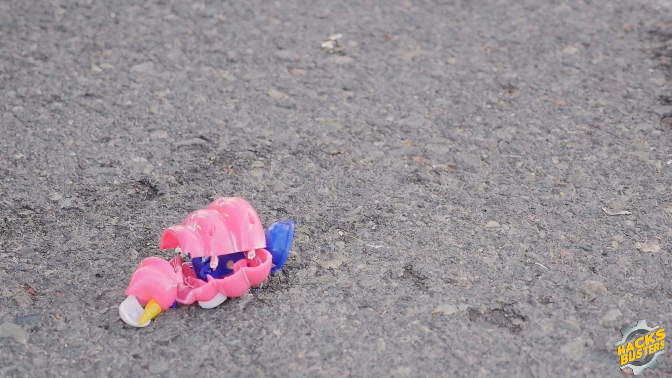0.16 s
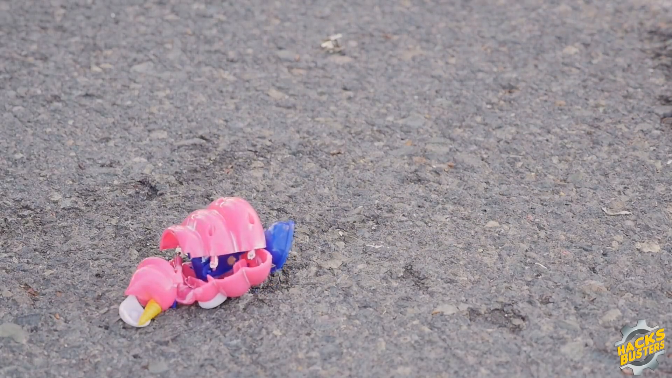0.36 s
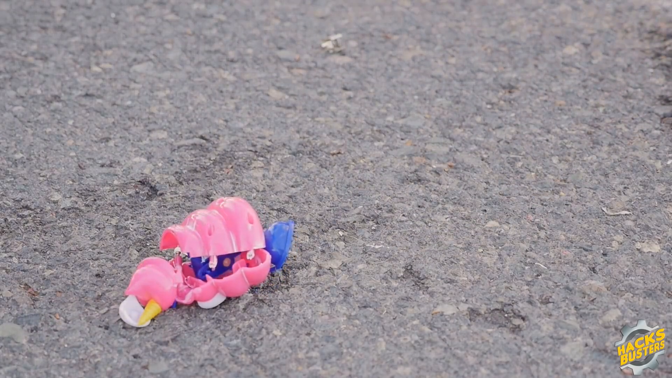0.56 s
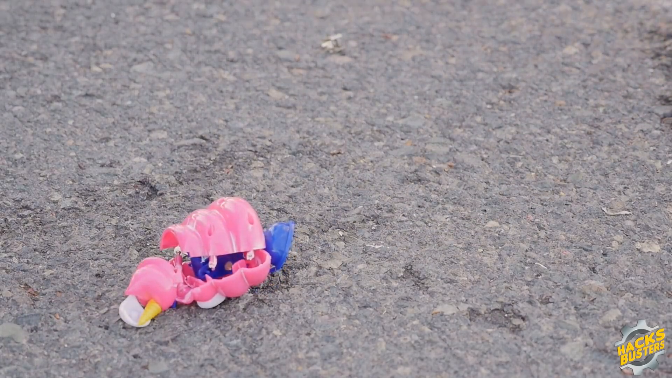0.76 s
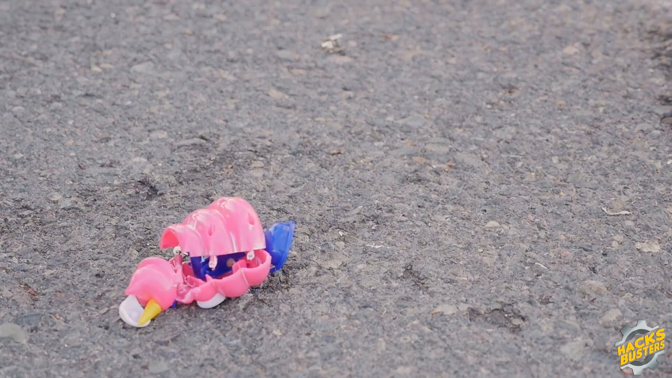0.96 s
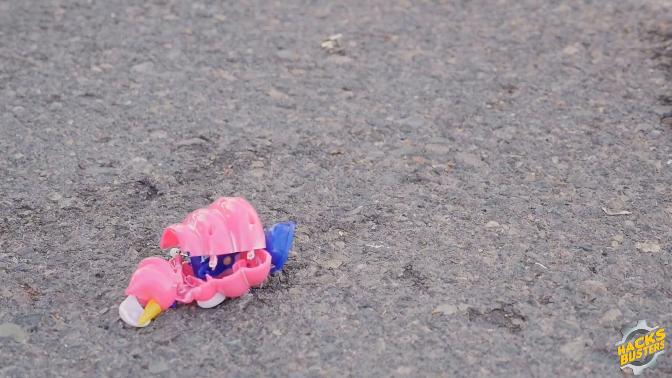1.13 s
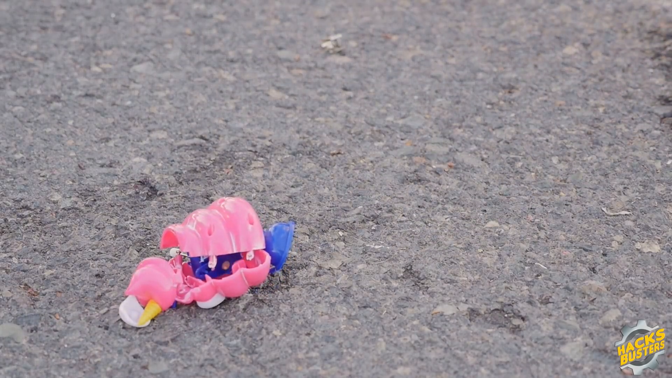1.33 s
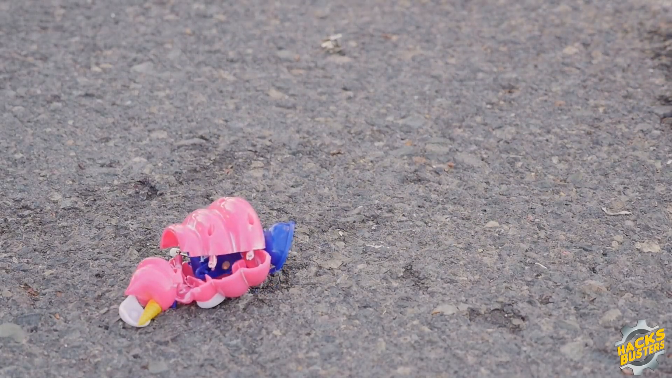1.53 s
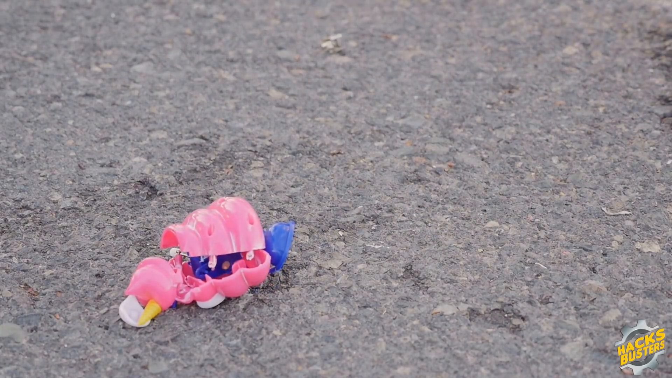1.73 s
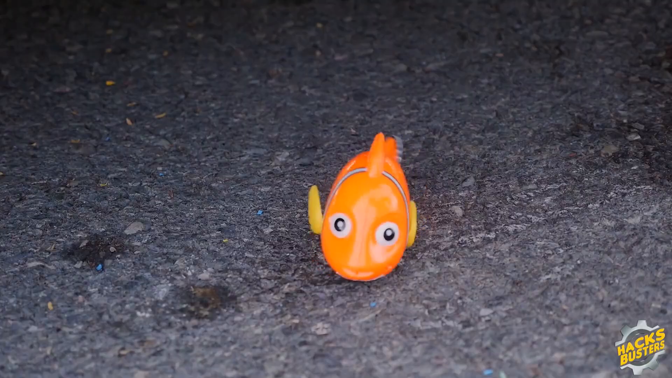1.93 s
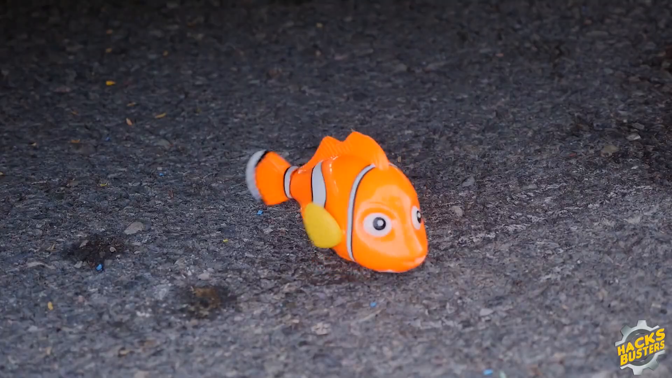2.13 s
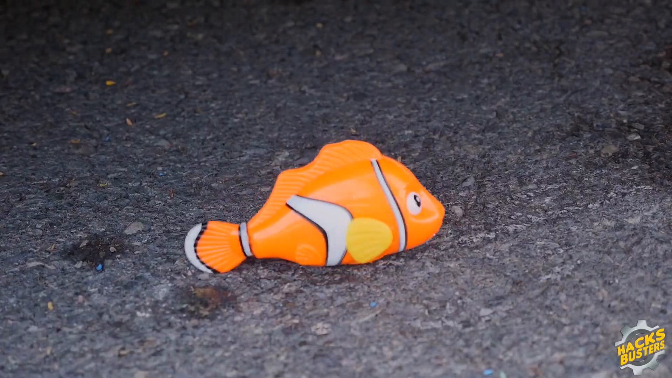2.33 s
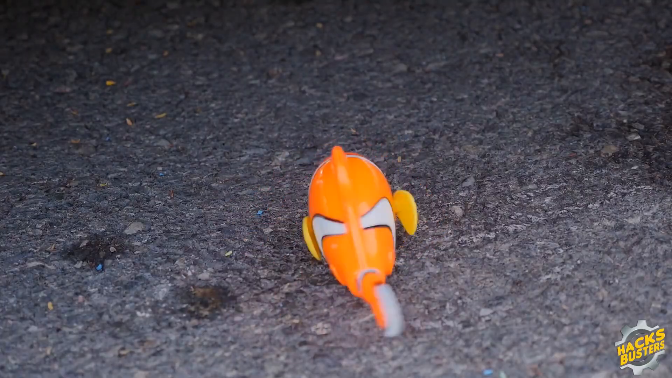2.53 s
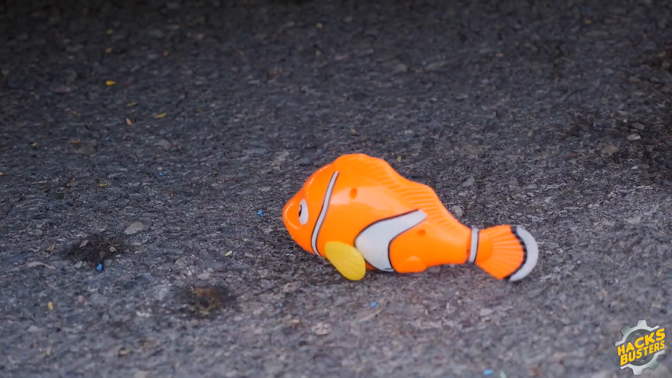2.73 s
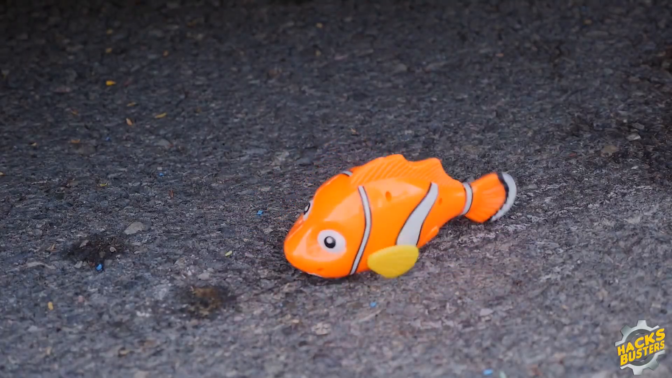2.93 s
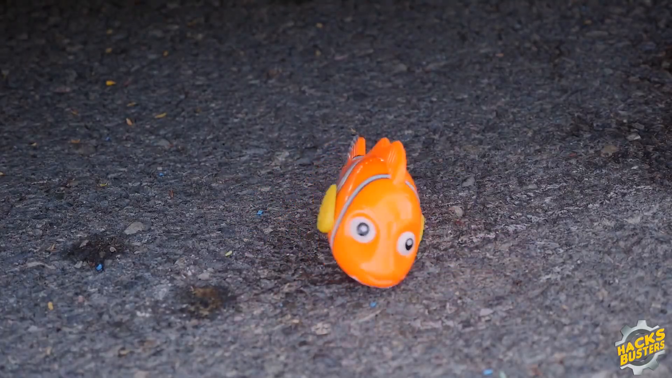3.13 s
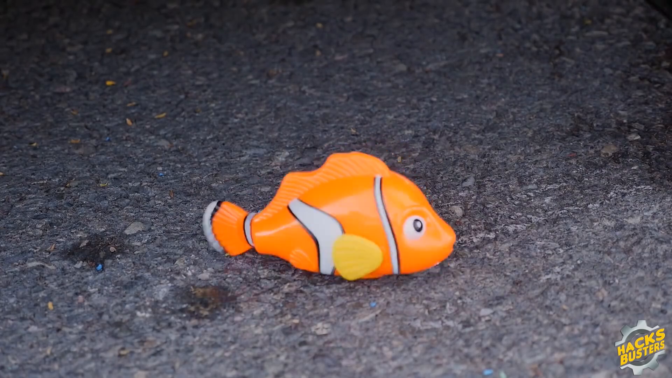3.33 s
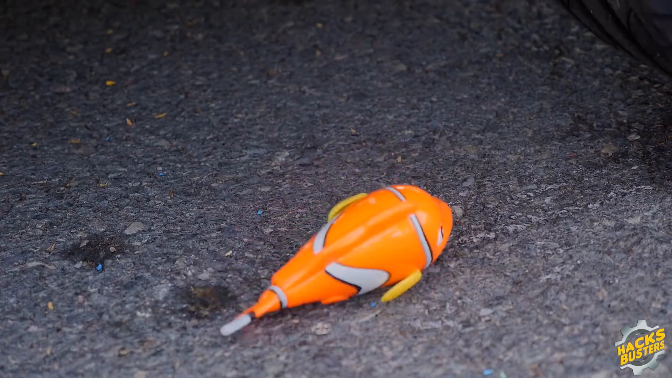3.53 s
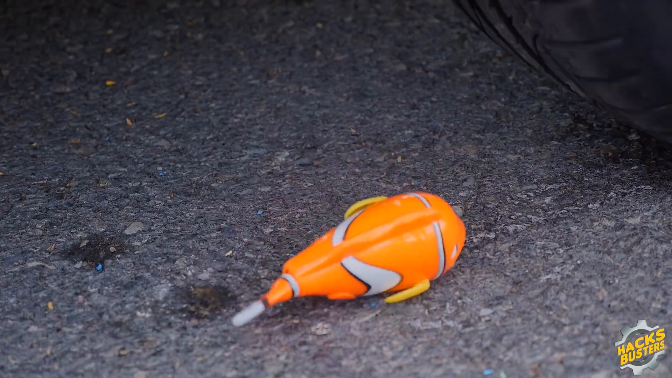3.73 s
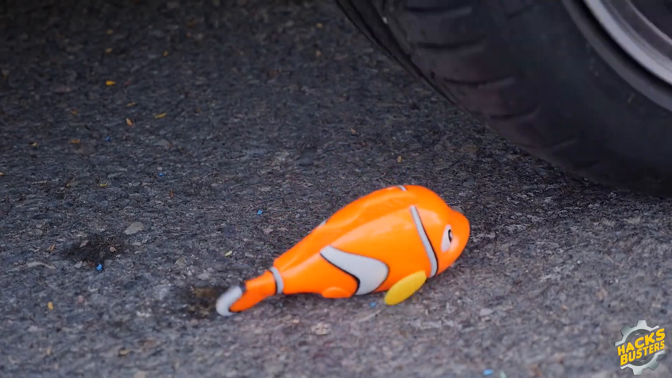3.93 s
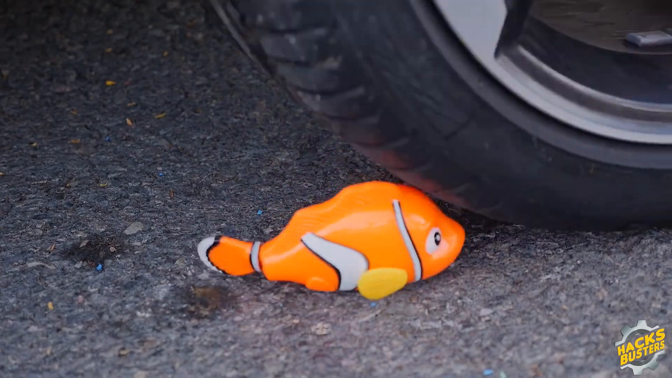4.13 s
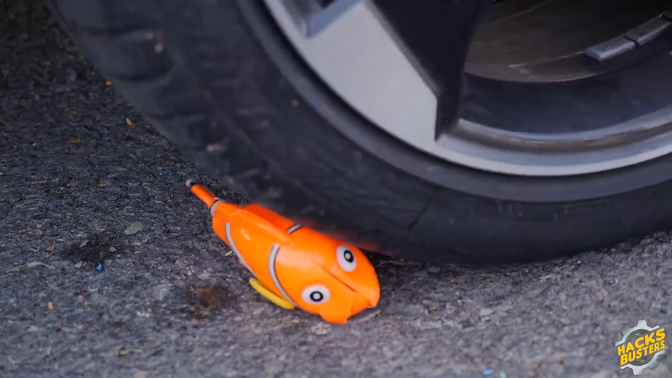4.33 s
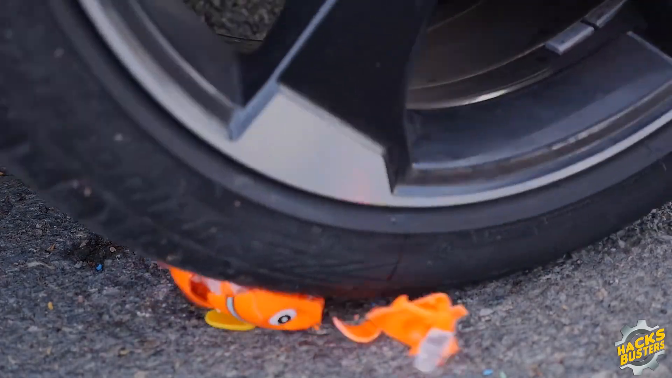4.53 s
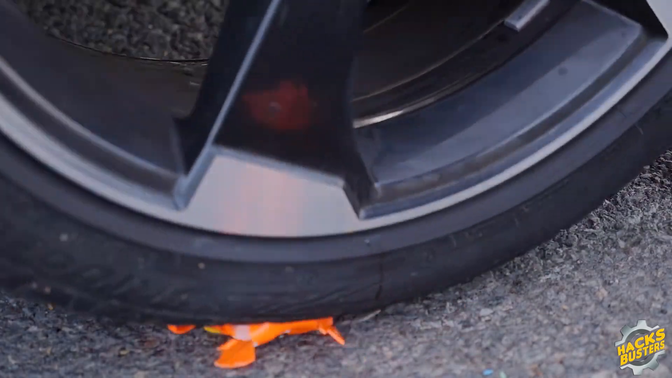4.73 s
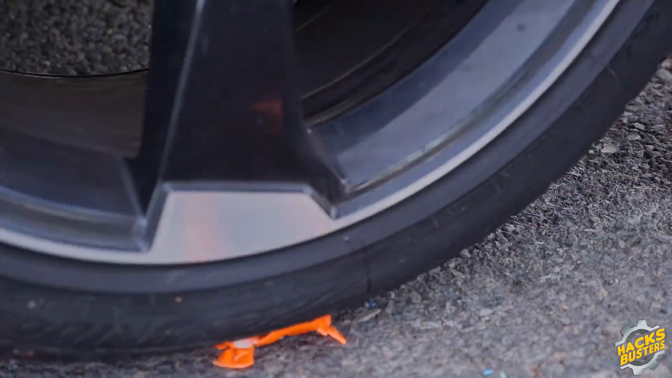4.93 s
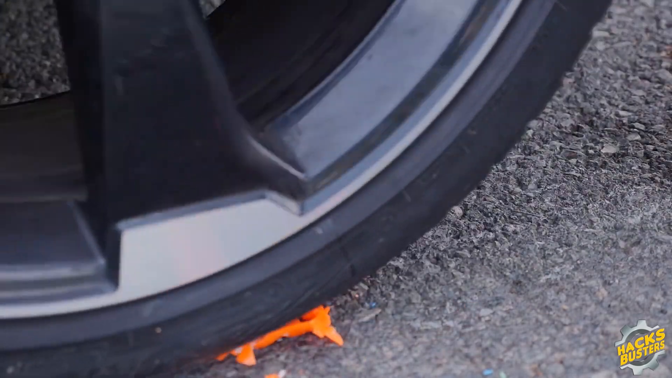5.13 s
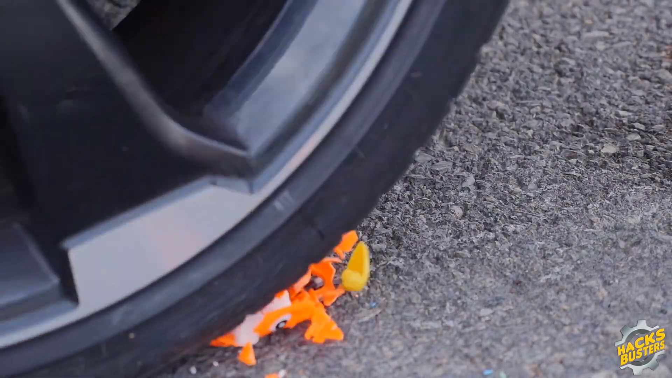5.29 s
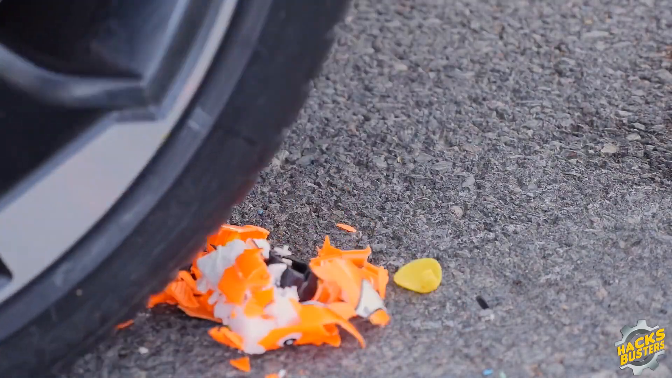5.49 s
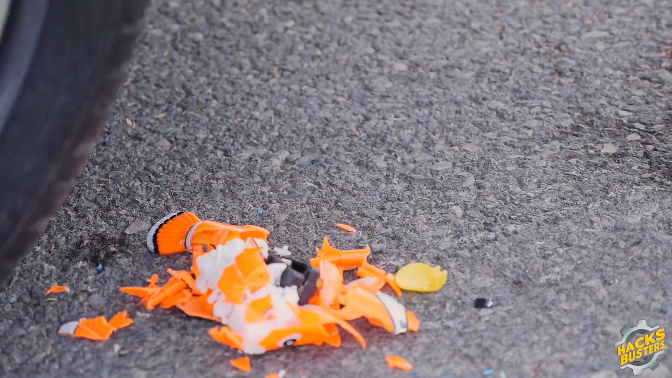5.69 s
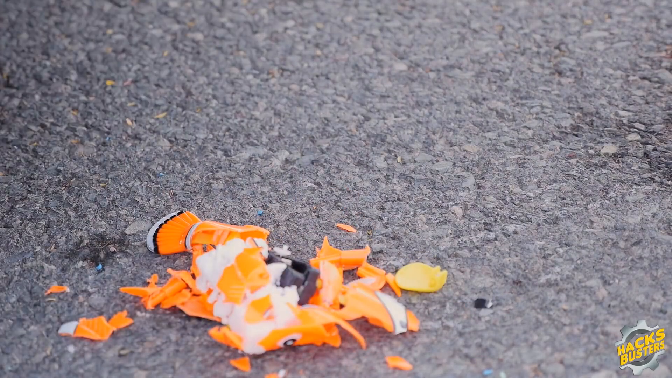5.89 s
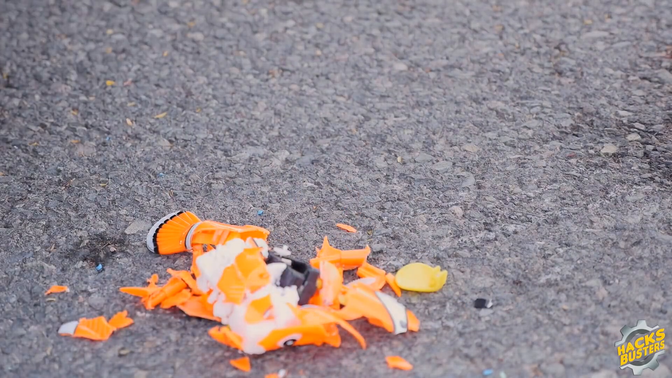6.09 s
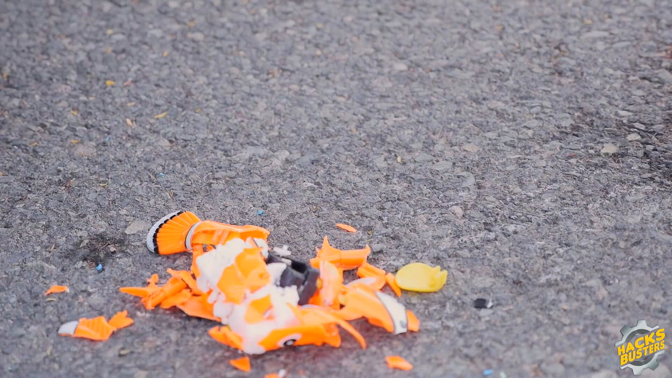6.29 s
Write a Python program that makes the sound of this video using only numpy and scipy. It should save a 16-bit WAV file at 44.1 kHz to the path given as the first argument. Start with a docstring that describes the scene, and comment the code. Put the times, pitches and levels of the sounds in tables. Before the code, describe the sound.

From the start, a motorised plastic toy whirrs close to the microphone, its gears scraping with a high, raspy sound over low street rumble. It bogs down at about 0.3 and 0.9 seconds and breaks off at 1.4. At 1.9 seconds the background changes to a quieter car hum, and a hollow plastic toy fish starts rattling and hopping on the asphalt. Its rapid clacks come in bursts, with short stalls and small pinging landings. At about 4.4 seconds a slowly rolling car tyre bursts the shell with a loud snap and the rattling stops. Sharp plastic cracks follow until about 5.4 seconds, over gritty crunching, a low groan from the flattened shell and a faint ring from the tyre. Shards scuff free as the crunching fades. Around 5.8 to 6 seconds a few splinters tick lightly, leaving only the hum.

```python
"""Two motorised plastic toys on asphalt, close to one microphone, over street rumble.
0-1.4 s: the first whirrs, gear teeth scraping into its case; it bogs down twice and breaks off.
1.9-4.4 s: over a quieter car hum, the second, a hollow fish, rattles and hops on the road.
From 4.4 s: a slowly rolling tyre bursts its shell; pieces crack under the tread, the tyre's air rings.
From 5.8 s: the last splinters tick as the wheel rolls off."""
import sys
import numpy as np
from scipy import signal
from scipy.fft import rfft, irfft, next_fast_len
from scipy.io import wavfile
from scipy.ndimage import uniform_filter1d, map_coordinates

SR = 44100
rng = np.random.default_rng(int(sys.argv[2]) if len(sys.argv) > 2 else 0)


def transcribe(u):
    """Save the signal u as a 16-bit wav file named by the first command-line argument.

    u: samples, shape (n,) or (channels, n), limited to [-1, 1]; the rate is SR.
    q: integer samples, one column per channel.
    """
    v = np.clip(np.atleast_2d(u).T, -1, 1)
    q = np.round(v * 32767).astype(np.int16)
    wavfile.write(sys.argv[1], SR, q)


N = 280035
TIME_S = np.arange(N) / SR
AGE_S = np.arange(SR // 8) / SR  # since a blow
GEARS_OFF_S, FISH_ON_S, FISH_OFF_S = 1.402, 1.892, 4.43
FREE_TOOTH_HZ, LABOURING_TOOTH_HZ = 1088, 568

# Street rumble (frequency [Hz], gain [dB])
STREET_SPECTRUM = [(25, -22), (70, -3.5), (160, -4), (560, -5.5), (1000, -10), (1700, -13.5), (6000, -25.5),
                   (15800, -33.5)]
# Faint steady tones (frequency [Hz], level [dB])
WHINE_TONES = [(4005, -65), (6008, -70), (8010, -74), (10008, -74)]
# Car hum (frequency [Hz], gain [dB])
CAR_SPECTRUM = [(25, -14), (70, -7), (150, -5.5), (230, -5.5), (600, -4), (1500, -8.5), (3200, -11.5),
                (7000, -22), (15800, -30)]
# Reflection decay (frequency [Hz], t60 [s])
REFLECTION_DECAY = [(200, 0.065), (1500, 0.097), (6000, 0.044), (15000, 0.016)]
# Gear case, full speed (frequency [Hz], gain [dB])
CASE_FAST_SPECTRUM = [(760, -54), (1300, -26.5), (1830, -17), (2120, -18.5), (2350, -20), (3430, -11.5),
                      (3840, -13), (4940, -3), (5650, -8), (6340, -4.5), (8490, -2.5), (9420, 0.5),
                      (11500, -3.5), (12500, -4.5), (15700, -15.5)]
# Gear case, labouring (frequency [Hz], gain [dB])
CASE_SLOW_SPECTRUM = [(760, -37.5), (1300, -25.5), (1760, -19.5), (2210, -21.5), (3880, -16), (4360, -11.5),
                      (5250, -20.5), (9720, -1.5), (10800, -8), (15700, -17.5)]
# Gear case resonances (frequency [Hz], width [Hz], gain [dB])
CASE_MODES = [(2154, 170, 6), (3430, 310, -3), (9740, 500, -2.5), (11500, 460, -2)]
# Motor bogging down (slowest moment [s], speed lost [0-1])
MOTOR_DRAGS = [(0.275, .44), (0.897, .56)]
# Middle band of the whirr (time [s], gain [dB])
WHIRR_MID_GAIN = [(0, 0), (.2, -0.5), (.44, -2.5), (.58, 1.5), (.74, 6.5), (.85, -0.5), (1.05, -1.5),
                  (1.39, -0.5)]
# Air resonance in the fish (time [s], frequency [Hz])
HOLLOW_PITCH = [(1.9, 864), (2.9, 923), (3.5, 798), (4.4, 784)]
# Fish shell (frequency [Hz], gain [dB])
SHELL_SPECTRUM = [(180, -66.5), (300, -20), (417, -19.5), (849, -4), (1300, -7.5), (1640, -2), (2140, -0.5),
                  (2320, -1.5), (2560, -2.5), (4000, -6.5), (4880, -7.5), (6050, -8.5), (8990, -15.5),
                  (11700, -17), (15500, -32.5)]
# Shell resonances (frequency [Hz], width [Hz], gain [dB])
SHELL_MODES = [(1126.4, 200, -10.5), (1647, 57, -2.5), (2334, 83, -0.5), (3110, 250, -6.5),
               (4744, 410, -0.5), (7920, 330, -5.5), (11300, 440, -24.5)]
# Runs of even beats between stalls (first beat [s], last beat [s], clack [dB], boom [dB])
RATTLE_BOUTS = [(1.897, 2.173, -18.6, -24), (2.198, 2.34, -19, -28.5), (2.361, 2.905, -19, -25),
                (2.935, 3.073, -19, -29), (3.125, 3.273, -20.3, -36), (3.327, 3.531, -19, -31.5),
                (3.585, 3.629, -19.5, -31.5), (3.666, 3.692, -20, -37), (3.724, 3.81, -21.5, -45),
                (3.968, 4.034, -22, -30), (4.087, 4.177, -21, -25.5), (4.245, 4.399, -20, -24.5)]
# Landings on a stiff part (time [s], clack [dB], ping [Hz], ping [dB], ping t60 [s])
FISH_LANDINGS = [(2.036, -46, 4980, -17.5, .04), (2.311, -34, 4840, -14.5, 0.053),
                 (3.083, -18.5, 4920, -16.5, 0.063), (3.192, -41.5, 4790, -13, 0.044),
                 (3.292, -22, 4880, -8.5, .045), (3.549, -19, 5070, -9.5, .009),
                 (3.77, -33, 5050, -12, 0.0036), (3.849, -18, 4780, -24.5, 0.0068),
                 (3.879, -20, 4770, -26, .006), (3.901, -19.5, 5380, -13, .006),
                 (3.937, -21, 4890, -40, 0.0066), (4.011, -21, 5000, -14.5, 0.0045),
                 (4.049, -23.5, 5100, -14.5, .005), (4.215, -22, 4430, -29.5, .006),
                 (4.267, -20, 4800, -31, 0.0056)]
# Grit and shards under the tread (time [s], level [dB])
GRIND_LEVEL = [(4.42, -41), (4.6, -36.5), (4.75, -39.5), (4.85, -52.5), (5, -45.5), (5.13, -57),
               (5.36, -42.5), (5.54, -49), (5.75, -58.5)]
# Grit crackle (frequency [Hz], gain [dB])
GRIT_SPECTRUM = [(500, -28.5), (2000, -5), (6000, -4), (12000, -9.5), (16000, -19)]
# Shards slipping free (time [s], level [dB], rise and fall constant [s])
SHARD_SCUFFS = [(5.433, -28, 0.012), (5.506, -33.5, 0.0017), (5.591, -33.5, 0.0024), (5.606, -41, 0.0072),
                (5.674, -39.5, 0.0054)]
# Groan of the flattened shell (time [s], level [dB])
GROAN_LEVEL = [(4.25, -77), (4.44, -56.5), (4.58, -42), (4.75, -49.5), (5.1, -72), (5.4, -64), (5.6, -97)]
# Groan (frequency [Hz], gain [dB])
GROAN_SPECTRUM = [(40, -27), (170, -21), (255, 4), (340, -2.5), (900, -32.5), (3000, -55)]
# Loose pieces landing (time [s], relative level [dB])
SPLINTER_LANDINGS = [(5.8073, -20), (5.8815, -30), (5.9865, -32.5)]
# Splinter resonances (frequency [Hz], gain [dB], t60 [s])
SPLINTER_MODES = [(7360, -7, 0.041), (8850, 8, 0.022), (13130, -11, 0.022)]
# Tyre cavity resonances (frequency [Hz], gain [dB], t60 [s])
TYRE_AIR_MODES = [(192, 6, 1), (278, -10, .35), (393, 3.5, 0.85), (630, -1.5, .55), (850, -2, 1),
                  (930, -7, .25)]
# Snapping plastic (frequency [Hz], gain [dB])
SNAP_SPECTRUM = [(530, -40), (900, -4), (1410, -3), (2270, 0.5), (3730, -2.5), (5220, 0), (7230, -2.5),
                 (8050, -3), (14200, -6.5), (16000, -14)]
# Two-step breaks: a snap, then the piece gives way
# (time [s], snap [dB], wait [s], second snap [dB], thump over snap [dB], treble over mid [dB])
SHELL_FRACTURES = [(4.426, -4, 0.011, -2, -22.5, -0.5), (4.4651, -13.5, .0092, -6, -23.5, -1.5),
                   (4.5169, -32, .0114, -24, -18, -9.5), (4.5415, -15, 0.011, -10, -21.5, -2.5),
                   (4.5801, -19, 0.019, -18, -19, 6), (4.6046, -11.5, 0.004, -10.5, -21.5, 3),
                   (4.6409, -12, 0.0032, -26, -13.5, -1.5), (4.6724, -28, .011, -21, -14, -2),
                   (4.7, -19, 0.0076, -13, -13, -2.5), (4.7352, -14.5, 0.03, -23.5, -12, -1.5),
                   (4.8103, -9, 0.0029, -23, -6.5, -6.5), (4.9037, -18.5, .0365, -34.5, -9.5, 5),
                   (4.9712, -7.5, .0236, -14, -17, 5), (5.044, -7.5, .0091, -14.5, -6.5, 6),
                   (5.2167, -31, .0182, -27, -18, -15), (5.3045, -12.5, 0.015, -12, -17, 2),
                   (5.375, -22.5, .0207, -14, -27.5, 4.5)]


def amp(db):
    """Decibels to gain."""
    return 10 ** (np.asarray(db) / 20)


def unit(x):
    """x at rms 1."""
    return x / np.sqrt(np.mean(x ** 2) + 1e-20)


def noise(n=N):
    """White noise, rms 1."""
    return rng.standard_normal(n)


def along(points, hz):
    """(Hz, value) points read on a log axis."""
    knots_hz, values = np.transpose(points)
    return np.interp(np.log(hz + 1), np.log(knots_hz + 1), values)


def curve(points, at_s=TIME_S):
    """(s, value) points read at the given times."""
    return np.interp(at_s, *np.transpose(points))


def wobble(knots_per_s):
    """Smooth random curve."""
    return map_coordinates(noise(int(N * knots_per_s / SR) + 4), [TIME_S * knots_per_s])


def fade(t60_s, age_s=AGE_S):
    """Exponential decay."""
    return np.exp(-np.log(1000) * age_s / t60_s)


def ring(hz, t60_s, age_s=AGE_S):
    """One struck mode."""
    return np.sin(2 * np.pi * hz * age_s) * fade(t60_s, age_s)


def high_pass(x, hz):
    """Small parts radiate no bass."""
    return signal.sosfilt(signal.butter(2, hz, "high", fs=SR, output="sos"), x)


def colour(x, spectrum, modes=()):
    """Minimum-phase filter of unit power: smooth spectrum with (Hz, width Hz, dB) resonances."""
    size = next_fast_len(len(x) + 4096, True)
    hz = np.fft.rfftfreq(size, 1 / SR)
    peaks = sum(amp(db) / (1 + (2 * (hz - mode_hz) / width_hz) ** 2) for mode_hz, width_hz, db in modes)
    gain = amp(along(spectrum, hz)) * (1 + peaks)
    cepstrum = irfft(np.log(np.maximum(unit(gain), 1e-5)), size)
    cepstrum[1:size // 2] *= 2
    cepstrum[size // 2 + 1:] = 0
    return irfft(rfft(x, size) * np.exp(rfft(cepstrum)), size)[:len(x)]


def sized(x, db, span_s):
    """Scale a blow to the energy of span_s at level db."""
    return x * amp(db) * np.sqrt(span_s * SR / (np.sum(x ** 2) + 1e-20))


def add(track, start_s, x):
    """Mix x into the track."""
    part = track[max(round(start_s * SR), 0):][:len(x)]
    part += x[:len(part)]


def background():
    """Street rumble and faint whine; a quieter car hum once the fish starts."""
    street = colour(noise(), STREET_SPECTRUM) * amp(-44 + .5 * wobble(11.2))
    whine = sum(amp(db) * unit(np.sin(2 * np.pi * hz * TIME_S)) for hz, db in WHINE_TONES)
    car = colour(noise(), CAR_SPECTRUM, [(150, 15, 2.9), (600.6, 31, 1.5)]) * amp(-55 + .5 * wobble(5.4))
    return np.where(TIME_S < FISH_ON_S, street + whine, car)


def reflections(x):
    """Short tail from the car body and nearby walls."""
    hz, age_s, bins = signal.stft(noise(SR // 3), SR, nperseg=256)
    tail = signal.istft(bins * fade(along(REFLECTION_DECAY, hz)[:, None], age_s), SR, nperseg=256)[1]
    return signal.fftconvolve(x, tail / np.linalg.norm(tail))[:N]


def rocking(x, depth_db=2.6):
    """Narrow resonances come and go as a toy rocks on the ground."""
    bins = signal.stft(x, nperseg=512)[2]
    field = uniform_filter1d(rng.standard_normal(bins.shape), size=3, axis=0)
    field = uniform_filter1d(field, size=30, axis=1)
    return unit(signal.istft(bins * amp(depth_db * unit(field)), nperseg=512)[1][:N])


def tooth_rate_hz(onset_s=.065, recovery_s=.089):
    """Each drag on the motor comes on quickly and lets go more slowly."""
    lost = sum(share * np.exp(-np.abs(TIME_S - s) / np.where(TIME_S < s, onset_s, recovery_s))
               for s, share in MOTOR_DRAGS)
    return FREE_TOOTH_HZ * np.clip(1 - lost, .1, 1)


def mid_swell(whirr, band_hz=(3900, 6900)):
    """The middle of the whirr swells and sinks."""
    band = signal.sosfiltfilt(signal.butter(2, band_hz, "band", fs=SR, output="sos"), whirr)
    return whirr + (amp(curve(WHIRR_MID_GAIN)) - 1) * band


def gears(full_speed_db=-21.5, db_per_octave=12.5, tooth_scatter_db=.6):
    """Each tooth scrapes a puff of noise into the case; slow teeth excite mainly its top resonances."""
    tooth_hz = tooth_rate_hz()
    level_db = full_speed_db + db_per_octave * np.log2(tooth_hz / FREE_TOOTH_HZ)
    teeth = np.cumsum(tooth_hz * (1 + .011 * wobble(40) + .016 * wobble(300))) / SR
    tooth_gain = amp(tooth_scatter_db * noise(int(teeth[-1]) + 1))[teeth.astype(int)]
    scrape = rocking(noise() * tooth_gain * np.exp(.25 * np.cos(2 * np.pi * teeth)))
    fast = colour(scrape, CASE_FAST_SPECTRUM, CASE_MODES)
    slow = colour(scrape, CASE_SLOW_SPECTRUM)
    blend = np.clip((tooth_hz - LABOURING_TOOTH_HZ) / (FREE_TOOTH_HZ - LABOURING_TOOTH_HZ), 0, 1) ** 1.3
    running = np.clip(1 - (TIME_S - GEARS_OFF_S) / .018, 0, 1) ** 2
    return mid_swell(blend * fast + (1 - blend) * slow) * amp(level_db) * running


def knock(hollow_hz, clack_db, boom_db):
    """The mechanism throws the shell on the road; it bounces twice and the air inside booms."""
    contact = (1 - np.exp(-AGE_S / .00064)) * (fade(.022) + amp(-15) * fade(.093))
    for delay_s, bounce_db in (.0078, -9), (.0135, -15):
        since_s = AGE_S - delay_s * np.exp(.2 * rng.normal())
        contact += amp(bounce_db + 3 * rng.normal()) * (since_s > 0) * fade(.018, np.abs(since_s))
    # Each blow hits another spot: modes and brightness vary.
    modes = [(hz, width_hz, db + 3 * rng.normal()) for hz, width_hz, db in SHELL_MODES]
    tilt_db_per_octave = 1.68 * rng.normal()
    spectrum = [(hz, db + tilt_db_per_octave * np.log2(hz / SR)) for hz, db in SHELL_SPECTRUM]
    clack = high_pass(colour(contact * noise(len(AGE_S)), spectrum, modes), 480)
    boom = ring(hollow_hz * (1 + .044 * rng.normal()), .023) * (1 - np.exp(-AGE_S / .0015))
    return sized(clack, clack_db, .014) + sized(boom, boom_db, .01)


def fish(beat_hz=43.6, rasp_fall_db_per_s=4, stall_db=-2.5):
    """Bouts of rattling and pinging landings, over the rasp of the toy's gearing."""
    blows, driven = np.zeros(N), np.zeros(N)
    gearing = colour(rocking(noise()), SHELL_SPECTRUM, SHELL_MODES)
    for s, clack_db, ping_hz, ping_db, t60_s in FISH_LANDINGS:
        chatter = noise(len(AGE_S)) * fade(.032)
        ping = np.diff(signal.fftconvolve(chatter, ring(ping_hz, t60_s)))
        add(blows, s, knock(curve(HOLLOW_PITCH, s), clack_db, boom_db=-53))
        add(blows, s, sized(ping, ping_db, .0042))
    for first_s, last_s, clack_db, boom_db in RATTLE_BOUTS:
        driven[(TIME_S > first_s - .005) & (TIME_S < last_s + .8 / beat_hz)] = 1
        for s in np.linspace(first_s, last_s, round((last_s - first_s) * beat_hz) + 1):
            add(blows, s, knock(curve(HOLLOW_PITCH, s), rng.normal(clack_db, .8), rng.normal(boom_db, 1.4)))
    stalled = 1 - uniform_filter1d(driven, size=SR // 100)
    rasp_db = -25.5 - rasp_fall_db_per_s * (TIME_S - FISH_ON_S) + stall_db * stalled + 3 * wobble(60)
    return blows + gearing * amp(rasp_db) * (TIME_S > FISH_ON_S) * (TIME_S < FISH_OFF_S)


def splinters():
    """Small loose pieces land, skitter and ring thinly."""
    ticks = np.zeros(N)
    ringing = sum(amp(db) * ring(hz, t60_s) for hz, db, t60_s in SPLINTER_MODES)
    for s, db in SPLINTER_LANDINGS:
        skitter = noise(len(AGE_S)) * (fade(.016) + amp(-17) * fade(.13))
        tink = signal.fftconvolve(skitter, ringing)[:len(AGE_S)]
        add(ticks, s, sized(tink, db - 16.5, .0054) + sized(high_pass(skitter, 7300), db - 14.5, .0042))
    return ticks


def tread(grains_per_s=1100):
    """Grit and shards crunch under the rubber and scuff free behind it; the flattened shell groans."""
    grains = noise() * (rng.random(N) < grains_per_s / SR)
    crackle = colour(unit(grains), GRIT_SPECTRUM)
    crunch = .78 * crackle + .31 * high_pass(colour(noise(), SNAP_SPECTRUM), 500)
    contact = np.interp(TIME_S, [4.41, 4.43, 5.75, 5.85], [0, 1, 1, 0])
    pressing = contact * amp(curve(GRIND_LEVEL) + 2.4 * wobble(41))
    slipping = sum(amp(db) * np.exp(-np.abs(TIME_S - s) / tau_s) for s, db, tau_s in SHARD_SCUFFS)
    scuff = high_pass(colour(noise(), SNAP_SPECTRUM), 1040) * slipping
    groan = colour(noise(), GROAN_SPECTRUM, [(201, 14, 7.4)]) * amp(curve(GROAN_LEVEL))
    return crunch * pressing + scuff + groan


def cracks(chip_span_s=(4.49, 5.2), chips_per_s=26, chip_over_grind_db=10):
    """Fracture steps and lesser chips (time [s], snap [dB], thump over snap [dB], treble [dB])."""
    rows = []
    for s, snap_db, wait_s, second_db, thump_db, treble_db in SHELL_FRACTURES:
        rows.append((s, snap_db, thump_db, treble_db))
        rows.append((s + wait_s, second_db, thump_db, treble_db - 2))
    for slot_s in np.arange(*chip_span_s, 1 / chips_per_s):
        s = slot_s + rng.random() / chips_per_s
        chip_db = curve(GRIND_LEVEL, s) + chip_over_grind_db + 3 * rng.normal()
        rows.append((s, chip_db, -13, -1))
    return rows


def breaking_shell(thump_hz=652):
    """Each crack: a sharp snap, a short ring of its shard, a thump that sets the tyre's air ringing."""
    snaps, thumps = np.zeros(N), np.zeros(N)
    for s, snap_db, thump_db, treble_db in cracks():
        tilted = [(hz, db + treble_db * np.clip(np.log2(hz / 5500) / 2, -.5, .5))
                  for hz, db in SNAP_SPECTRUM]
        shard_modes = [(hz, .052 * hz, -2) for hz in rng.uniform(2540, 13070, size=5)]
        burst = (fade(.0077) + amp(-7.5) * fade(.021)) * noise(len(AGE_S))
        add(snaps, s, sized(colour(burst, tilted, shard_modes), snap_db, .0029))
        thump = ring(thump_hz * np.exp(.063 * rng.normal()), .0074) * (1 - np.exp(-AGE_S / .00032))
        add(thumps, s, sized(thump, snap_db + thump_db, .0058))
    cavity = sum(amp(db) * ring(hz, t60_s, TIME_S[:SR // 2]) for hz, db, t60_s in TYRE_AIR_MODES)
    tyre_air = amp(-68.5) * signal.fftconvolve(thumps, cavity)[:N]
    return high_pass(snaps + thumps + tyre_air, 303)


def scene():
    """All sources at one microphone, both channels alike."""
    near = gears() + fish() + breaking_shell() + tread() + splinters()
    mono = near + amp(-14.5) * reflections(near) + background()
    return np.array([mono, mono])


def record(dry):
    """Clip at full scale, cut above 16.3 kHz."""
    size = next_fast_len(N + SR // 2)
    passband = np.fft.rfftfreq(size, 1 / SR) < 16300
    return irfft(rfft(np.clip(dry, -1, 1), size) * passband, size)[:, :N]


dry = scene()
out = record(dry)
transcribe(out)
```